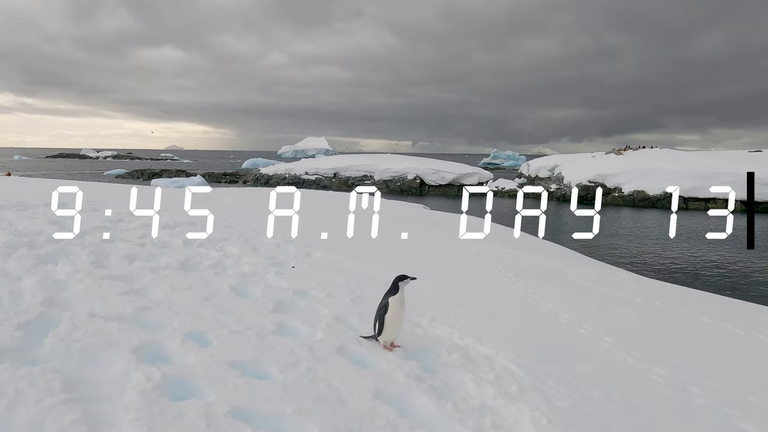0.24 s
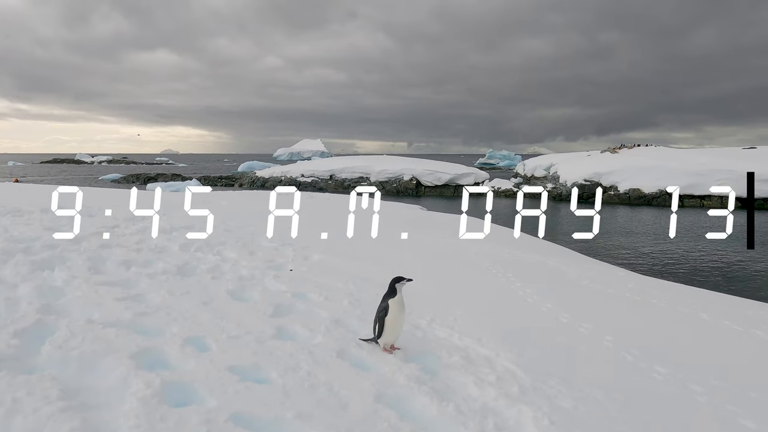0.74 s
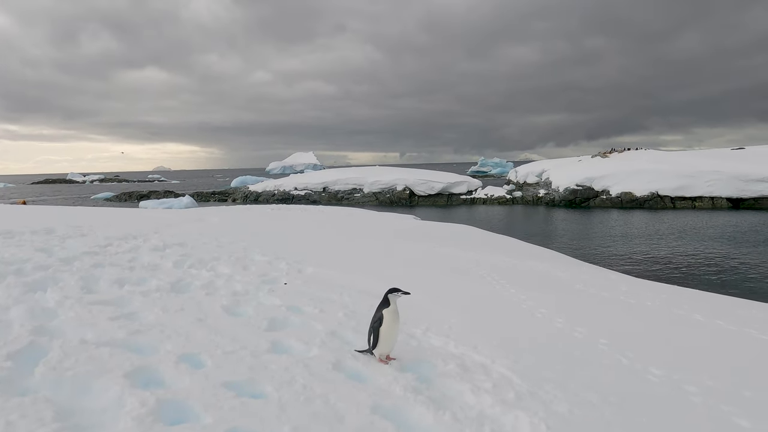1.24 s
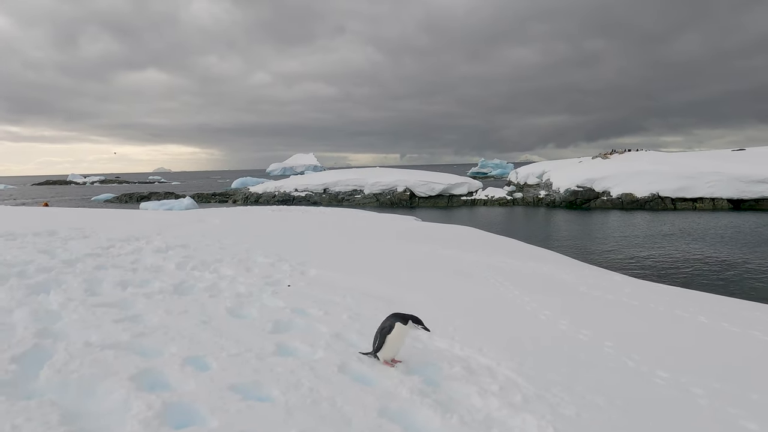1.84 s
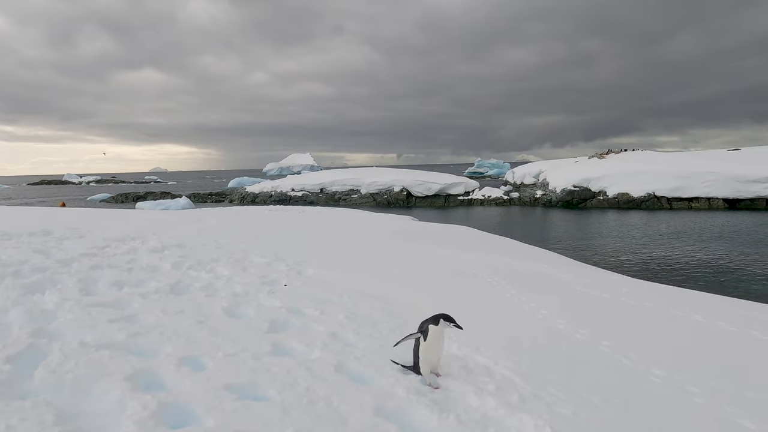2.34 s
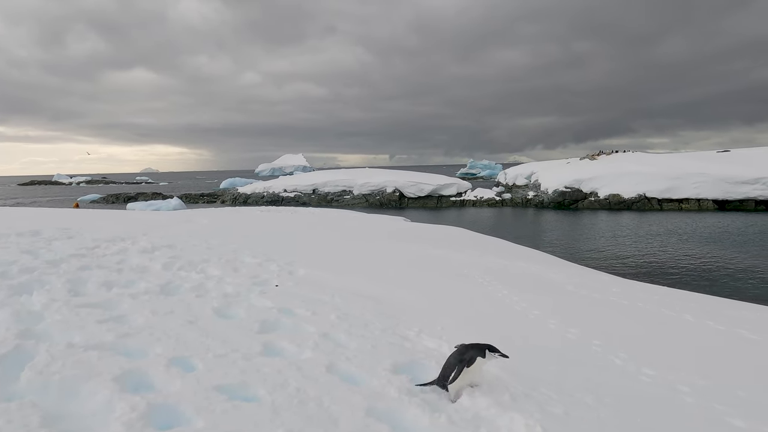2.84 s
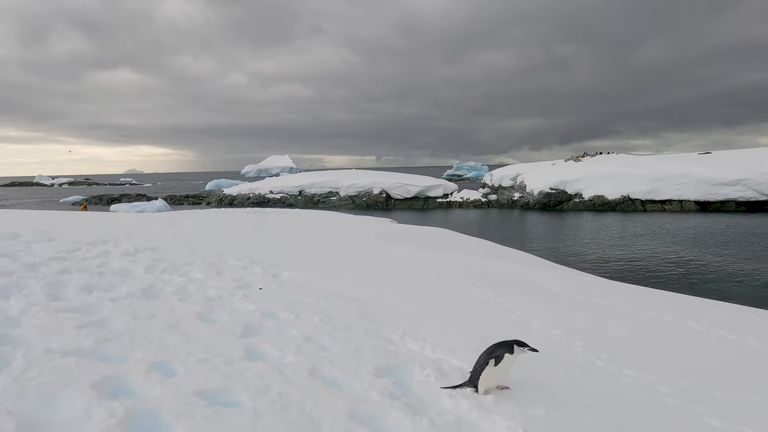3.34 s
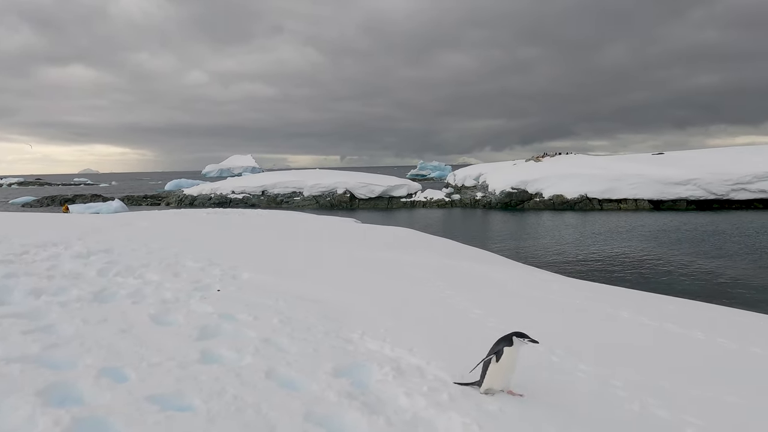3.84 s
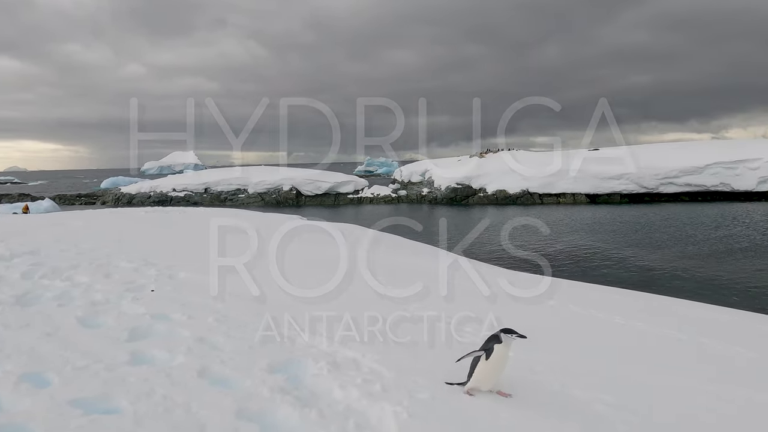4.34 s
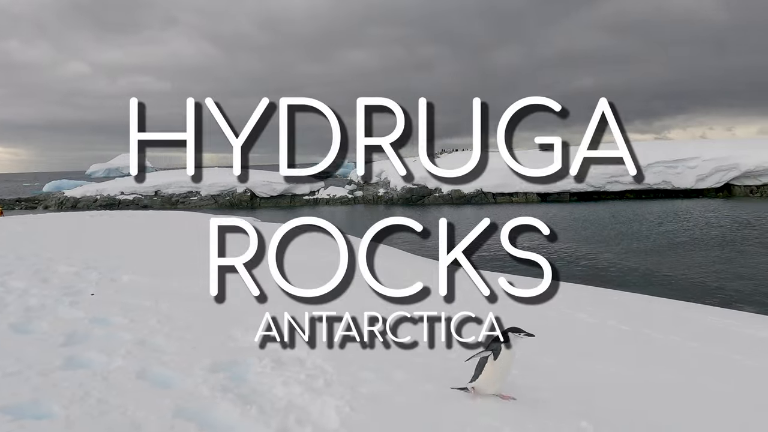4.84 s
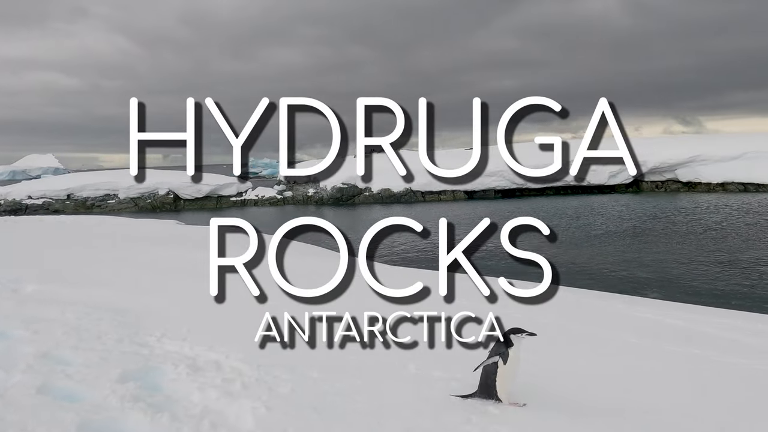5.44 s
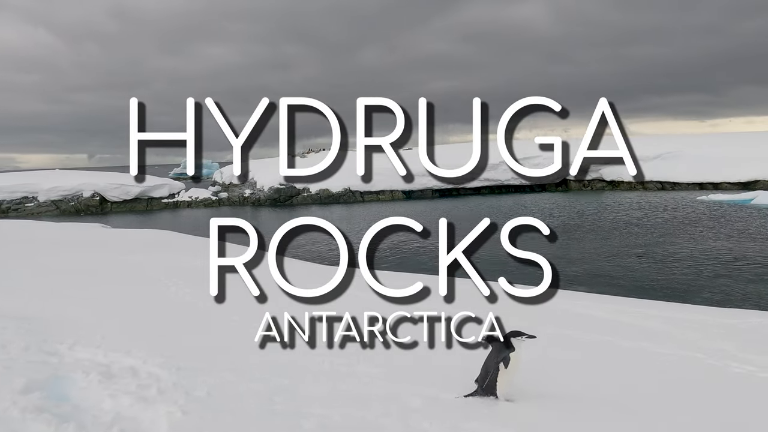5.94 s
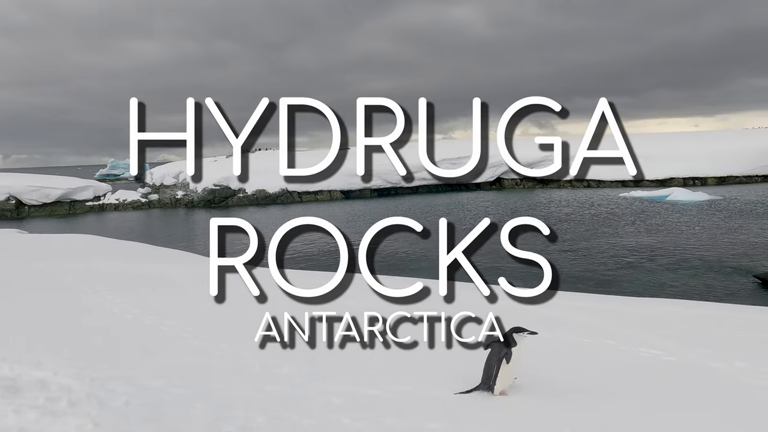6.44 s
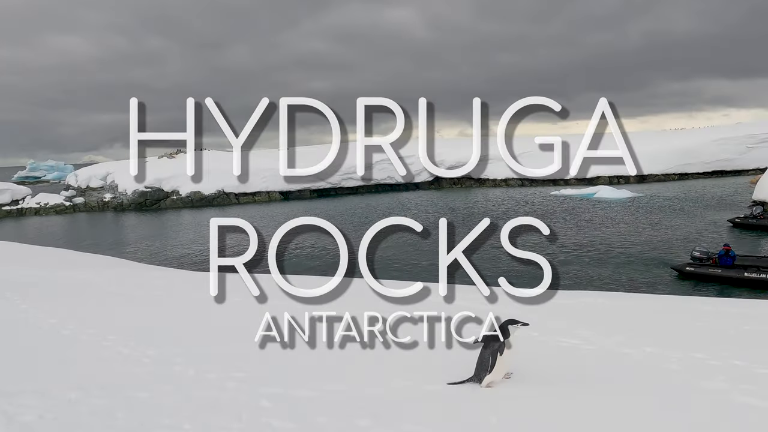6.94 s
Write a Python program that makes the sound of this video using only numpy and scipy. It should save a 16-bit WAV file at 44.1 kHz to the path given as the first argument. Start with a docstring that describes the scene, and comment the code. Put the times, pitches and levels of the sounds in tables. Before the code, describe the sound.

An open snowy shore with an exposed microphone. From 0 s penguins call in a quick run: short, nasal, arched honks around 1 kHz, two or three per second, with hoarse rattling rasps between them and slight echoes off snow and rocks. Two tiny high peeps come near 1 s. A blurred colony murmurs behind. Low wind rumbles and buffets in gusts, with sharper puffs near 0.2, 1.1 and 2.45 s. Snow crust ticks at about 0.4, 1.1, 2 and 3.3 s; a faint snow swish passes at 1.5 s. From 2.3 to 4.5 s the honks are higher, denser and overlapping, while the wind eases after 3.4 s. A dull wind boom lands at 4.7 s. Calls weaken, the last faint ones ending near 6.1 s. A distant low outboard hum swells around 6.2 s and recedes. Soft sea wash, light gusts and fine snow hiss remain until 7.2 s.

```python
"""Penguins call in a quick run on a snowy shore: rasps alternate with arched honks and die away over a murmur.
Wind buffets the microphone and eases off; a distant outboard motor hums; the sea washes, crusted snow hisses and ticks.
The birds are fluttering harmonics with syrinx sidebands and rattling noise, echoed by a snow bank and rocks.
The motor is a sum of sines; wind, sea, snow and colony are coloured noises with level curves, puffs and bursts."""
import sys
import numpy as np
from scipy import signal
from scipy.fft import rfft, irfft
from scipy.io import wavfile
from scipy.ndimage import uniform_filter1d, minimum_filter1d

SR = 44100
rng = np.random.default_rng(int(sys.argv[2]) if len(sys.argv) > 2 else 0)


def log_audio(samples):
    """Write samples as a 16-bit WAV file to the path given in sys.argv[1]."""
    # one column per channel
    frames = np.atleast_2d(samples).T
    # limit to full scale, then quantise
    limited = np.clip(frames, -1, 1)
    pcm = np.round(limited * 32767).astype(np.int16)
    wavfile.write(sys.argv[1], SR, pcm)


N = 317740
T = np.arange(N) / SR
BIN_HZ = np.fft.rfftfreq(N, 1 / SR)

# All table levels are relative; mix gains follow in the functions.
# Arched honks. Each row: start in seconds, length in seconds, time to the crest in seconds, start pitch in Hz,
# crest pitch in Hz, end pitch in Hz, level in dB, fundamental in dB over level, overtones in dB over level,
# sidebands in dB, hoarseness 0-1.
HONKS = [ (0.155, .152, .066, 883, 1039, 819, -27.5, -9.5, -10.5, -14, 0.19),
         (0.478, 0.048, .003, 1066, 1037, 840, -28.5, -13, -7, -21, .15),
         (0.677, 0.16, .066, 877, 1057, 852, -29, -9.5, -11.5, -9, 0.17),
         (0.919, 0.027, 0.03, 987, 1030, 1030, -34, -8, -12, -11, 0.15),
         (1.007, 0.051, .003, 1010, 1010, 825, -30, -12, -10.5, -14, 0.21),
         (1.308, 0.15, .068, 806, 1029, 850, -30, -10, -14, -7.5, .2),
         (1.652, 0.04, .003, 1010, 990, 910, -32, -8, -12, -19, 0.34),
         (1.875, 0.12, .022, 968, 995, 882, -36.5, -7.5, -8, -12, 0.3),
         (2.327, 0.1, .02, 1070, 1204, 988, -29, -8.5, -11, -15, 0.19),
         (2.761, 0.16, .054, 1020, 1214, 1000, -34, -8.5, -14.5, -11, .17),
         (2.916, 0.1, .005, 910, 880, 734, -38, -22, -19, -18, 0.23),
         (3.04, 0.094, .022, 1177, 1270, 1015, -27.5, -14, -14, -12, 0.17),
         (3.17, 0.071, .005, 750, 762, 696, -34.5, -21, -5.5, -19, 0.3),
         (3.205, 0.06, .048, 1085, 1161, 1160, -30.5, -2, -9, -6, 0.1),
         (3.257, 0.12, .043, 1215, 1256, 1008, -28, -6.5, -10, -14, 0.12),
         (3.461, .085, .018, 928, 977, 794, -33, -13, -8.5, -20, 0),
         (3.669, 0.17, .083, 980, 1240, 1006, -33, 0, -10.5, -11, 0.4),
         (3.826, 0.11, .005, 1016, 1032, 809, -35.5, -3.5, -16, -13, 0.47),
         (3.905, 0.056, .046, 1040, 1210, 1190, -34.5, -2.5, -12, -6, 0.26),
         (3.958, .125, .045, 1118, 1264, 1103, -30.5, -12.5, -12, -8, 0.47),
         (4.128, 0.21, .105, 1050, 1213, 954, -33, -7, -10, -9, 0.36),
         (4.482, 0.115, .008, 1112, 1128, 1067, -35, -6, -12, -6, 0.39),
         (4.6, 0.065, .005, 960, 960, 876, -50, 1, -12, -21, 0),
         (4.698, .024, .003, 850, 864, 825, -38, -16, -7, -20, .1),
         (4.755, 0.07, .01, 897, 923, 830, -43, -17, -5, -18, 0.04),
         (4.934, 0.11, .008, 1138, 1162, 1004, -33, -8, -13, -4, .17),
         (5.126, 0.069, .05, 1027, 1148, 1110, -40, -1.5, -9, -4, 0.12),
         (5.197, 0.094, .008, 1184, 1183, 1004, -36, -6.5, -12, -8, 0.32),
         (5.29, 0.034, .012, 800, 847, 830, -43.5, -10, -16, -20, .15),
         (5.469, 0.096, .037, 1004, 1135, 1000, -43, 1, -11, -10.5, 0.55),
         (5.549, 0.051, .005, 960, 942, 825, -42.5, -11, -5, -15, .15),
         (5.617, .045, .04, 768, 840, 825, -46.5, -14, -16, -22, 0.14),
         (5.703, 0.084, .02, 872, 910, 800, -49.5, -4, -15, -26, 0),
         (6.091, 0.059, .02, 826, 860, 815, -47.5, -7, -11, -27, .05), ]
# Hoarse notes between the honks. Each row: start in seconds, length in seconds, pitch in Hz, level in dB,
# fundamental in dB over level.
RASPS = [ (0.0, 0.019, 1212, -36.5, -2), (0.024, 0.15, 1050, -45, 4), (0.59, 0.1, 1047, -39, -1.5),
         (0.835, 0.074, 1060, -41.5, 1.5), (0.895, 0.048, 1037, -45, 6.5), (1.062, 0.12, 1044, -44, 5),
         (1.616, 0.045, 1035, -43, 1.5), (1.836, 0.043, 973, -39.5, -4.5), (2.053, 0.065, 1146, -43, -0.5),
         (2.104, 0.078, 1097, -41, -1), (2.193, .055, 1010, -43, -3.5), (2.27, 0.048, 1117, -40, -5),
         (2.886, 0.066, 1008, -43.5, -3), (2.974, 0.087, 1108, -41, -7), (3.107, 0.048, 1040, -38.5, -3),
         (3.159, 0.062, 1090, -44, 3.5), (3.362, 0.082, 1011, -38.5, -4.5),
         (4.064, 0.075, 1070, -46.5, 1.5), (4.408, 0.076, 1131, -41, -1.5), (4.676, .04, 860, -47, -14),
         (4.828, 0.056, 900, -52.5, -1), (4.894, 0.053, 1141, -40.5, -6), (5.389, 0.064, 1066, -46.5, -1),
         (5.966, 0.048, 1070, -51.5, 4.5), (6.017, 0.057, 1045, -51.5, 5), ]
# Resonance of throat and bill. Each row: frequency in Hz, gain in dB.
THROAT_SPECTRUM = [(600, -34.5), (950, -9), (1250, -4), (1550, -13), (1850, -4.5), (2300, 0), (2500, -8.5),
                   (2650, -4), (3100, -6.5), (3450, -10.5), (3750, -14), (4100, -19.5), (4600, -20),
                   (5350, -16.5), (5800, -35), (7600, -40.5), (9000, -50)]
# Noisy part of the voice. Each row: frequency in Hz, gain in dB.
GRIT_SPECTRUM = [(500, -32.5), (800, -2.5), (1050, 4), (1400, 0), (1650, 3.5), (1950, 1), (2350, -1),
                 (2600, -9.5), (3100, -11), (3600, -5), (4100, -12), (5200, -15.5), (6000, -23),
                 (7500, -33.5), (10000, -62.5)]
# Borders in Hz between fundamental, main band and overtones of the grit.
REGISTER_BORDERS_HZ = [1350, 2430]
# Resistance to turning into grit, as an exponent: fundamental, main band, overtones.
REGISTER_CLARITY = [2.6, 1.75, 1.2]
# Thin peeps of a far bird. Each row: start in seconds, length in seconds, pitch in Hz, level in dB.
PEEPS = [(0.925, .032, 4060, -56.5), (0.978, .036, 4010, -56)]

# Wind between gusts. Each row: time in seconds, slow pressure swings in dB, rumble in dB.
WIND_LEVELS = [(0, -25, -28), (.2, -26, -26), (.63, -26.5, -23), (.7, -21, -26), (.82, -27.5, -27),
               (.88, -23.5, -24.5), (1.4, -23.5, -23.5), (1.85, -24, -20.5), (2.62, -27, -27),
               (2.73, -32, -44), (2.8, -22, -24), (3.18, -20.5, -25), (3.42, -29, -44.5), (3.7, -30.5, -33),
               (4.06, -32, -49), (4.52, -43.5, -48), (4.9, -38.5, -41), (5.3, -37, -45.5),
               (5.55, -41, -50.5), (6.0, -33.5, -38), (6.42, -39.5, -43), (6.87, -51, -48),
               (7.2, -35.5, -40.5)]
# Gusts. Each row: start in seconds, length in seconds, rise of swings and rumble in dB, buffeting in dB.
GUSTS = [ (-0.03, 0.075, 3.5, -27.5), (0.137, 0.12, 4, -23.5), (0.256, 0.22, 2.5, -35),
         (0.413, 0.27, 0, -23.5), (0.837, 0.23, 1.5, -23.5), (1.096, 0.17, 2, -26), (1.453, .11, 3, -26.5),
         (1.563, 0.19, -2.5, -26), (2.028, 0.081, 3.5, -30.5), (2.222, 0.21, 3.5, -30),
         (2.368, 0.19, 4.5, -23.5), (2.543, 0.14, 4.5, -31.5), (2.79, 0.23, 0, -37.5),
         (3.027, 0.15, 0, -29), (3.494, 0.11, 8.5, -49), (3.645, .11, 6, -34.5), (3.743, 0.12, 9.5, -40.5),
         (3.873, .11, 10.5, -39), (4.11, 0.17, 1, -42), (4.26, 0.14, 10.5, -41.5),
         (4.647, 0.19, 15.5, -38.5), (4.986, 0.11, 10.5, -38.5), (5.113, 0.15, 7, -46),
         (5.635, 0.13, 3.5, -53), (5.965, 0.17, 2.5, -47), (6.223, .09, 7, -55), (6.48, 0.25, 14, -35.5),
         (7.1, 0.094, 6.5, -45), ]
# Slow pressure swings. Each row: frequency in Hz, gain in dB.
SWING_SPECTRUM = [(8, -7.5), (24, -2), (45, -2.5), (62, -6), (90, -33.5), (300, -71), (1000, -110)]
# Wind rumble. Each row: frequency in Hz, gain in dB.
RUMBLE_SPECTRUM = [(30, -22.5), (60, -3.5), (78, -1), (100, -1), (128, -7.5), (170, -16.5), (250, -23),
                   (600, -59), (2000, -110)]
# Fine turbulence. Each row: frequency in Hz, gain in dB.
BUFFET_SPECTRUM = [(70, -10), (140, 4.5), (205, -1.5), (300, -6.5), (470, -13.5), (800, -22.5),
                   (1500, -37.5), (4000, -49.5), (12000, -84.5)]
# Eddies that hit the microphone. Each row: time in seconds, peak in dB, nominal length in seconds.
EDDIES = [(0.204, -13.5, 0.035), (0.452, -23.5, 0.026), (0.549, -27, 0.023), (0.867, -27, 0.027),
          (1.013, -28, 0.021), (1.123, -20.5, 0.037), (1.478, -21, 0.05), (2.062, -28, 0.011),
          (2.436, -18, 0.017), (2.452, -13.5, 0.026), (2.474, -18, 0.028), (2.527, -14, 0.016)]
# Eddy noise. Each row: frequency in Hz, gain in dB.
EDDY_SPECTRUM = [(150, -26), (350, -3), (520, 9.5), (700, -0.5), (1000, -6.5), (1500, -12.5), (3000, -40),
                 (8000, -50), (14000, -79.5)]
# Broad, booming eddies. Each row: time in seconds, peak in dB, nominal length in seconds.
BOOMS = [(2.435, -17.5, 0.12), (4.68, -17.5, 0.06), (4.728, -30, 0.13), (6.254, -26, 0.068),
         (7.138, -29.5, 0.048)]
# Boom noise. Each row: frequency in Hz, gain in dB.
BOOM_SPECTRUM = [(90, -47), (170, -4.5), (205, 7), (235, -4.5), (280, -23), (600, -40), (3000, -95)]

# Cracks of the snow crust. Each row: time in seconds, peak in dB, low edge in Hz, high edge in Hz, squeak in dB.
TICKS = [(0.4085, -33, 4170, 6600, -32), (0.424, -41, 4500, 6400, -29), (0.45, -36, 4200, 5800, -37.5),
         (0.54, -47.5, 1800, 4500, -36), (1.064, -41, 2580, 7000, -32), (1.961, -26.5, 1620, 8000, -36),
         (1.97, -35, 1610, 8000, -36), (1.9908, -34.5, 2500, 7500, -37), (3.3425, -35, 3500, 9500, -25),
         (4.3235, -40, 2020, 8000, -24), (4.809, -47, 5500, 9500, -24), (6.348, -52.5, 5960, 10000, -12.5),
         (6.4306, -49.5, 6500, 10000, -12.5)]
# Crack noise. Each row: frequency in Hz, gain in dB.
CRACK_SPECTRUM = [(1200, 5), (1800, 4.5), (3200, -5.5), (4600, 3), (5900, -11), (6900, -3.5), (7700, -26),
                  (9000, -38), (13000, -43)]
# Thin squeak in a crack. Each row: frequency in Hz, gain in dB.
SQUEAK_SPECTRUM = [(5000, -37), (7500, -2), (8200, 1.5), (9000, -13), (11000, -21), (12500, -22),
                   (14500, -32.5)]

# Motor as it carries over the water. Each row: time in seconds, level in dB.
MOTOR_LEVELS = [(3.7, -60), (4.1, -44), (4.6, -45), (5.1, -42), (5.4, -54), (6.19, -27), (6.48, -48.5),
                (6.9, -51), (7.2, -50)]
# Motor harmonics. Each row: multiple of the firing rate, level in dB.
MOTOR_ORDERS = [(1, 6), (2, -14.5), (3, -23)]

# Sea wash. Each row: frequency in Hz, gain in dB.
SEA_SPECTRUM = [(60, -6), (200, -4.5), (400, -6), (700, -7.5), (1050, -10.5), (1500, -14), (2200, -19),
                (3500, -26), (5000, -32.5), (7000, -40.5), (10000, -57.5), (14000, -82)]
# Loose snow on the wind. Each row: time in seconds, hiss in dB.
DRIFT_LEVELS = [(0, -77), (1.35, -78), (2.3, -71.5), (2.7, -79.5), (3.25, -70), (4.2, -68.5), (4.45, -64),
                (4.9, -65.5), (5.1, -68), (5.75, -70.5), (6.3, -76), (7.2, -74)]
# Snow hiss. Each row: frequency in Hz, gain in dB.
HISS_SPECTRUM = [(1500, 1.5), (3000, 3), (5000, -1), (6200, -5), (7300, -5), (8600, -9), (10300, -18),
                 (11500, -23.5), (12600, -20), (14500, -39)]
# Brief swish of sliding snow. Each row: time in seconds, level in dB.
SWISH_LEVELS = [(1.36, -76), (1.402, -58), (1.496, -53), (1.596, -59.5), (1.632, -59), (1.64, -64)]
# Swish noise. Each row: frequency in Hz, gain in dB.
SWISH_SPECTRUM = [(2000, -4), (4000, -1), (5500, 0.5), (7000, -10.5), (8500, -14), (10500, -31.5),
                  (14000, -52)]
# Far birds merged into a murmur. Each row: time in seconds, level in dB.
MURMUR_LEVELS = [(0, -42.5), (1.2, -53), (2.0, -44.5), (3.2, -45.5), (4.2, -44), (5.2, -50.5), (5.8, -63),
                 (7.2, -63)]
# Murmur noise. Each row: frequency in Hz, gain in dB.
MURMUR_SPECTRUM = [(500, -25), (800, -2.5), (1100, 2.5), (1700, 1.5), (2250, -4.5), (2600, -9),
                   (3700, -14.5), (5000, -18.5), (8000, -63.5)]

# quieter below the crest; fundamental and overtones win back HONK_WIN_BACK_SHARE of the loss
HONK_SAG_DB_PER_OCT, HONK_WIN_BACK_SHARE = 18.5, 0.54
# the attack grows by HONK_SWELL_SHARE of the time to the crest
HONK_ATTACK_S, HONK_SWELL_SHARE, HONK_RELEASE_S, HONK_TAIL_S = 0.011, 0.21, 0.027, 0.006
HONK_WOBBLE_OCT, HONK_WOBBLE_S = 0.008, 0.012
HONK_FALL_BEND = 0.9  # more bend delays the fall
RASP_ATTACK_S, RASP_RELEASE_S, RASP_TAIL_S = 0.009, 0.031, 0.019
RASP_FALL_OCT_PER_S, RASP_OVERTONE_DB, RASP_SIDEBAND_DB, RASP_HOARSE = 0.61, -8.5, -6, 0.55
# the top of the voice opens as the note's highest pitch passes SHRILL_PITCH_HZ
SHRILL_FROM_HZ, SHRILL_FULL_HZ, SHRILL_PITCH_HZ, SHRILL_DB_PER_OCT = 3100, 5500, 1210, 32
DOUBLING_HZ = 1085  # notes reaching above repeat every second cycle, others every third
UNEVEN_DB = 3.5  # spread between the upper lines of a note
RATTLE_HZ, RATTLE_DEPTH = 85.9, 0.17
GUST_EDGE_S = 0.028
CALM_BUFFET_DB, BUFFET_DB_PER_RUMBLE_DB = -28, 0.46  # the first is for rumble at 0 dB
MOTOR_FIRING_HZ = 166.5
SEA_DB = -48.5
TOP_HZ = 14400


def undb(db):
    """Decibels to gain."""
    return 10 ** (np.asarray(db) / 20)


def unit(x):
    """Scale to an rms of 1."""
    return x / np.sqrt(np.mean(x ** 2))


def curves(rows, t):
    """The columns of a table, joined by straight lines in time."""
    time_s, *columns = np.transpose(rows)
    return [np.interp(t, time_s, column) for column in columns]


def response(points, hz):
    """Gain of a spectrum table, linear in dB over log frequency."""
    point_hz, db = np.transpose(points)
    return undb(np.interp(np.log(np.maximum(hz, 1)), np.log(point_hz), db))


def noise(points):
    """Gaussian noise coloured by a spectrum table, at unit rms."""
    spectrum = rfft(rng.standard_normal(N)) * response(points, BIN_HZ)
    return unit(irfft(spectrum, N))


def wander(hz):
    """Smooth random signal of unit rms: noise under a Gaussian low-pass of width hz."""
    spectrum = rfft(rng.standard_normal(N)) * np.exp(-(BIN_HZ / hz) ** 2)
    return unit(irfft(spectrum, N))


def steadied(x, seconds):
    """Even out slow swells by dividing by the running rms."""
    power = uniform_filter1d(x ** 2, max(int(seconds * SR), 2))
    return x / np.sqrt(np.maximum(power, 0) + 1e-3)


def envelope(age_s, length_s, attack_s, release_s):
    """Linear attack, hold and release, from 0 to 1."""
    return np.clip(np.minimum(age_s / attack_s, (length_s - age_s) / release_s), 0, 1)


def note(start_s, length_s):
    """The samples that a note covers, and its age in seconds at each."""
    span = np.arange(max(int(start_s * SR), 0), min(int((start_s + length_s) * SR), N))
    return span, (span - span[0]) / SR


def penguins(line_count=17, honks_db=-3.2, rasps_db=-1):
    """Honks and rasps; each line of the voice flutters on its own, over rattling grit in three registers."""
    knots = rng.standard_normal((line_count, N // 200 + 2, 2)) @ np.array([1, 1j]) / np.sqrt(2)
    flutter = signal.resample_poly(knots, 200, 1, axis=1)[:, :N]
    rattle_hz = RATTLE_HZ * (1 + 0.3 * flutter[0].real)
    rattle = unit(1 + RATTLE_DEPTH * np.sin(2 * np.pi * np.cumsum(rattle_hz) / SR))
    spectrum = rfft(noise(GRIT_SPECTRUM))
    register = np.searchsorted(REGISTER_BORDERS_HZ, BIN_HZ)
    grit = [unit(irfft(spectrum * (register == k), N)) * rattle
            for k in range(len(REGISTER_BORDERS_HZ) + 1)]
    source = flutter, grit
    honks = sum(honk(source, *row) for row in HONKS)
    rasps = sum(rasp(source, *row) for row in RASPS)
    return undb(honks_db) * honks + undb(rasps_db) * rasps


def honk(source, start_s, length_s, crest_s, start_hz, crest_hz, end_hz, level_db,
         fundamental_db, overtone_db, sideband_db, hoarse):
    """One push of breath: pitch and loudness arch together; the voice starts harsh and is purest at the crest."""
    full_s = length_s + HONK_TAIL_S
    span, age_s = note(start_s, full_s)
    rising = np.clip(age_s / max(crest_s, 0.001), 0, 1)
    falling = np.clip((age_s - crest_s) / max(length_s - crest_s, 0.005), 0, 1) ** HONK_FALL_BEND
    # octaves below the crest
    slack_oct = np.log2(crest_hz / start_hz) * (1 - np.sin(rising * np.pi / 2))
    slack_oct = slack_oct + np.log2(crest_hz / end_hz) * np.sin(falling * np.pi / 2) ** 2
    wobble = np.interp(age_s, HONK_WOBBLE_S * np.arange(20), rng.standard_normal(20))
    pitch_hz = crest_hz * 2 ** (HONK_WOBBLE_OCT * wobble - slack_oct)
    sag_db = HONK_SAG_DB_PER_OCT * slack_oct
    attack_s = HONK_ATTACK_S + HONK_SWELL_SHARE * crest_s
    loudness = undb(level_db - sag_db) * envelope(age_s, full_s, attack_s, HONK_RELEASE_S)
    won_back_db = HONK_WIN_BACK_SHARE * sag_db
    harsh = 0.8 + 1.3 * (1 - rising) + 0.9 * falling ** 2
    return syrinx(source, span, pitch_hz, loudness, fundamental_db + won_back_db,
                  overtone_db + won_back_db, sideband_db, hoarse * harsh)


def rasp(source, start_s, length_s, hz, level_db, fundamental_db):
    """A harsh note of even strength that droops a little in pitch."""
    full_s = length_s + RASP_TAIL_S
    span, age_s = note(start_s, full_s)
    pitch_hz = hz * 2 ** (-RASP_FALL_OCT_PER_S * (age_s - length_s / 2))
    loudness = undb(level_db) * envelope(age_s, full_s, RASP_ATTACK_S, RASP_RELEASE_S)
    return syrinx(source, span, pitch_hz, loudness, fundamental_db, RASP_OVERTONE_DB,
                  RASP_SIDEBAND_DB, RASP_HOARSE)


def syrinx(source, span, hz, loudness, fundamental_db, overtone_db, sideband_db, hoarse,
           jitter=0.0071, top_sidebands_db=11, blur=0.66):
    """One note: harmonics, sidebands of a syrinx that repeats every second or third cycle, and hoarse grit."""
    flutter, grit = source
    cycles = 2 if hz.max() > DOUBLING_HZ else 3
    multiple = np.arange(cycles, 6 * cycles + 1)[:, None] / cycles
    low, high = multiple < 1.4, multiple > 2.4
    pitch_hz = hz * (1 + jitter * flutter[0, span].real)
    hoarse = np.clip(hoarse, 0, 0.95)

    # higher lines flutter more
    rough = np.clip(blur * hoarse * multiple / 2, 0, 1)
    wavering = np.sqrt(1 - rough) + np.sqrt(rough) * flutter[1:len(multiple) + 1, span]
    turns = rng.random(multiple.shape) + multiple * np.cumsum(pitch_hz) / SR
    lines = (wavering * np.exp(2j * np.pi * turns)).imag * np.sqrt(2)

    is_sideband = multiple % 1 > 0
    side_db = np.minimum(sideband_db + top_sidebands_db * high, 0) * is_sideband
    top = np.interp(multiple * pitch_hz, [SHRILL_FROM_HZ, SHRILL_FULL_HZ], [0, 1])
    shrill_db = top * SHRILL_DB_PER_OCT * np.log2(hz.max() / SHRILL_PITCH_HZ)
    gain = response(THROAT_SPECTRUM, multiple * hz) * undb(side_db + shrill_db)
    # the balance of the upper lines shifts through each note
    first, last = rng.standard_normal((2, len(multiple), 1))
    turn = np.linspace(0, np.pi, len(span))
    uneven_db = UNEVEN_DB * (first * np.cos(turn) + last * np.sin(turn))
    gain = gain * undb(uneven_db * (multiple > 2))

    voice = 0
    registers = (low, ~low & ~high, high)
    levels_db = (fundamental_db, 0, overtone_db)
    for register, db, air, clarity in zip(registers, levels_db, grit, REGISTER_CLARITY):
        share = gain * register
        tone = (share * lines).sum(0) / np.sqrt((share ** 2).sum(0))
        grit_power = hoarse ** clarity
        mix = np.sqrt(1 - grit_power) * tone + np.sqrt(grit_power) * air[span]
        voice = voice + undb(db) * mix
    return np.bincount(span, voice * loudness, N)


def peeps():
    """Short pure sines high above the honks."""
    out = 0
    for start_s, length_s, hz, db in PEEPS:
        shape = envelope(T - start_s, length_s, RASP_ATTACK_S, RASP_ATTACK_S)
        out = out + undb(db) * shape * np.sin(2 * np.pi * hz * T)
    return out


def bank(x, delay_s=0.013, echo_db=-14):
    """One early echo off a snow bank; it beats against the gliding notes."""
    return undb(echo_db) * np.interp(T - delay_s, T, x, left=0)


def rocks(x, t60_s=0.52, first_s=0.03, wet_db=-14):
    """Scattered echoes from rocks and snow banks: convolution with decaying coloured noise."""
    tail = noise([(500, 8.5), (2200, -12.0), (7000, -6.0)])  # Hz, dB
    tail = tail * undb(-60 * T / t60_s) * (T > first_s)
    impulse = tail[:SR] / np.sqrt(np.sum(tail ** 2))
    return undb(wet_db) * signal.fftconvolve(x, impulse)[:N]


def wind():
    """Slow pressure swings and rumble swell in gusts; finer turbulence comes in puffs on their crests."""
    swing_db, rumble_db = curves(WIND_LEVELS, T)
    rise_db = 0
    buffet_gain = undb(CALM_BUFFET_DB + BUFFET_DB_PER_RUMBLE_DB * rumble_db)
    for start_s, length_s, gust_db, buffet_db in GUSTS:
        gust = envelope(T - start_s, length_s, GUST_EDGE_S, GUST_EDGE_S)
        rise_db = rise_db + gust_db * gust
        buffet_gain = np.maximum(buffet_gain, undb(buffet_db) * gust)
    swing = steadied(noise(SWING_SPECTRUM), 0.08)
    rumble = steadied(noise(RUMBLE_SPECTRUM), 0.04)
    puffs = unit(1 + 0.3 * np.abs(swing + rumble)) * undb(1.46 * wander(39))
    slow = swing * undb(swing_db + 0.97 * wander(15))
    slow = slow + rumble * undb(rumble_db + 2.4 * wander(24))
    turbulence = steadied(noise(BUFFET_SPECTRUM), 0.046) * puffs * buffet_gain
    whirls = eddies(EDDIES, EDDY_SPECTRUM, gain_db=-6.5) + eddies(BOOMS, BOOM_SPECTRUM, gain_db=-5.0)
    return slow * undb(rise_db + 0.07) + turbulence + whirls


def eddies(rows, spectrum, gain_db):
    """Whirls of air on the microphone: noise under a quick swell and exponential decay."""
    burst, shape = steadied(noise(spectrum), 0.012), 0
    for time_s, db, length_s in rows:
        age = np.maximum(T - time_s + 0.0022, 0) / max(length_s / 5, 0.002)  # peak at 1
        shape = shape + undb(db + gain_db) * age * np.exp(1 - age)
    return burst * shape


def ticks(decay_s=0.0072, rise_s=0.00087):
    """The snow crust cracks in short noise bursts, each in its own band, with a thin squeak."""
    crack = steadied(noise(CRACK_SPECTRUM), 0.004)
    squeak = steadied(noise(SQUEAK_SPECTRUM), 0.003)
    out = np.zeros(N)
    for time_s, db, low_hz, high_hz, squeak_db in TICKS:
        span, _ = note(time_s - 0.01, 0.08)
        band_pass = signal.butter(2, sorted([low_hz, high_hz]), "band", fs=SR, output="sos")
        band = signal.sosfilt(band_pass, crack[span])
        slope_s = np.where(T[span] < time_s, rise_s, decay_s)
        shape = np.exp(-np.abs(T[span] - time_s) / slope_s)
        out[span] += (band + squeak[span] * undb(squeak_db + 6)) * undb(db) * shape
    return out


def motor():
    """A small outboard far off across the water: harmonics of a slightly wavering firing rate."""
    level_db, = curves(MOTOR_LEVELS, T)
    firing_hz = MOTOR_FIRING_HZ * (1 + 0.01185 * wander(5.94))
    phase = 2 * np.pi * np.cumsum(firing_hz) / SR
    hum = sum(undb(db) * np.sin(multiple * phase) for multiple, db in MOTOR_ORDERS)
    fade_in = np.interp(T, [3.6, 4.1], [0, 1])
    return unit(hum) * undb(level_db - 2.0 + wander(14.0)) * fade_in


def shore():
    """The sea washes steadily; loose snow hisses over the crust in fine grains and swishes once."""
    hiss_db, = curves(DRIFT_LEVELS, T)
    swish_db = np.interp(T, *np.transpose(SWISH_LEVELS), left=-np.inf, right=-np.inf)
    sea = noise(SEA_SPECTRUM) * undb(SEA_DB + 0.95 * wander(9.7))
    grains = undb(1.7 * wander(250))
    hiss = noise(HISS_SPECTRUM) * undb(hiss_db + 11.5)
    swish = noise(SWISH_SPECTRUM) * undb(swish_db + 4.5)
    return sea + grains * (hiss + swish)


def murmur(swell_db=3.0):
    """The rest of the colony, blurred by distance into coloured noise that swells and ebbs."""
    level_db, = curves(MURMUR_LEVELS, T)
    return noise(MURMUR_SPECTRUM) * undb(level_db - 4 + swell_db * wander(15))


def scene():
    """Birds and their echoes, wind, snow, motor, shore and colony at one microphone."""
    birds = penguins() + peeps()
    near = birds + bank(birds) + rocks(birds)
    return (near + wind() + ticks() + motor() + shore() + murmur())[None]


def record(dry):
    """A limiter holds down peaks above 0.33 of full scale; an elliptic low-pass cuts the top."""
    peak = -minimum_filter1d(-np.abs(dry), 400, axis=-1)  # running maximum
    gain = uniform_filter1d(np.minimum(1, 0.33 / (peak + 1e-9)), 400, axis=-1)
    low_pass = signal.ellip(8, 0.2, 70, TOP_HZ, fs=SR, output="sos")
    return signal.sosfilt(low_pass, dry * gain)


dry = scene()
out = record(dry)
log_audio(out)
```